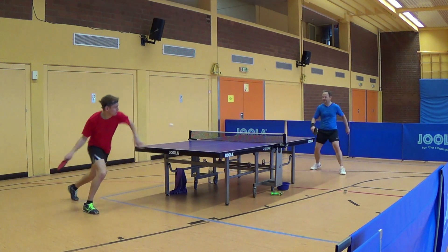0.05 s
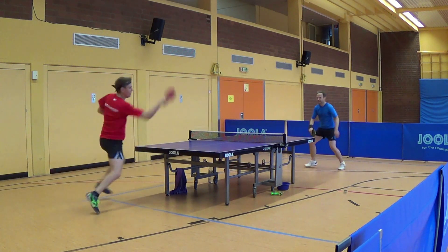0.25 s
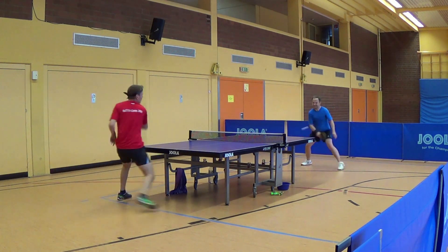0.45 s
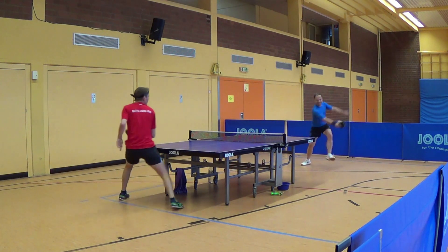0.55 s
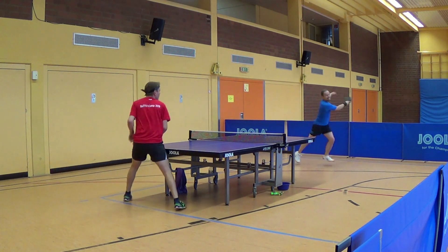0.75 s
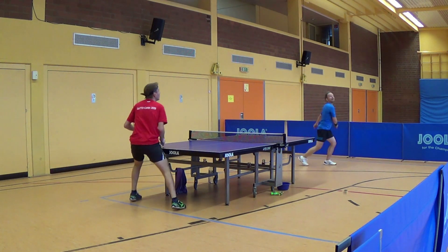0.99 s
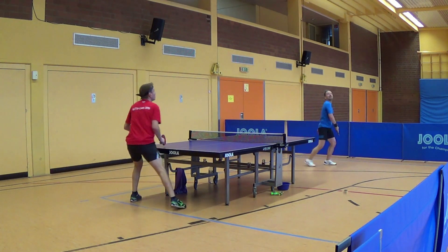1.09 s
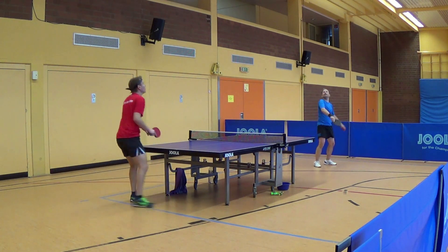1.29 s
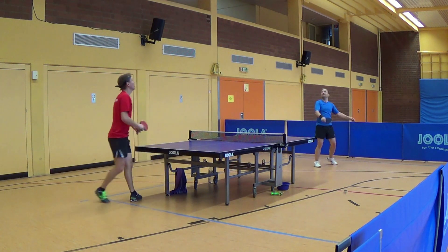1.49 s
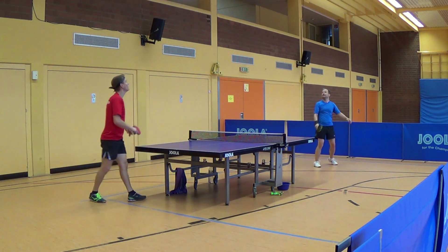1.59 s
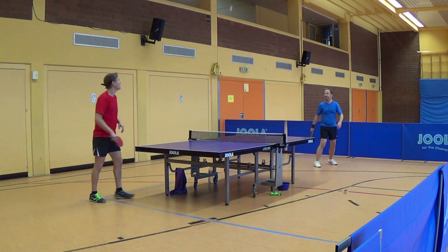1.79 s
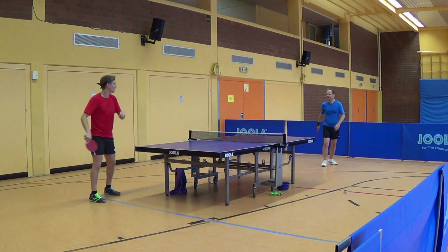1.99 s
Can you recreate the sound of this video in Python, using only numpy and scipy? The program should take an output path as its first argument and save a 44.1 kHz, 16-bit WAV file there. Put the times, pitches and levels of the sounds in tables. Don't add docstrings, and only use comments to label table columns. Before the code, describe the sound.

Short table tennis exchange in a big echoing gym: bat click, rubber sole squeaks and floor slaps, hard table bounce, far bat click with strong echo, one late squeak, then the ring fades into faint hiss.

```python
import sys
import numpy as np
from scipy import signal
from scipy.io import wavfile

SR = 44100
rng = np.random.default_rng(int(sys.argv[2]) if len(sys.argv) > 2 else 0)


def output_pcm(signal):
    pcm = np.clip(np.atleast_2d(signal).T, -1, 1) * 32767
    wavfile.write(sys.argv[1], SR, np.round(pcm).astype(np.int16))


def convert_level_to_amplitude(level_db):
    exponent = np.asarray(level_db, float) / 20
    return 10 ** exponent


N = 90404
LEAD_S = .1


def clock():
    return np.arange(N + int(LEAD_S * SR)) / SR - LEAD_S


def noise():
    return rng.standard_normal(len(clock()))


def rms_one(x):
    return x / np.sqrt(np.mean(x ** 2) + 1e-20)


def peak_one(x):
    return x / (np.abs(x).max() + 1e-12)


def at_hz(points, hz):
    table_hz, value = np.array(points).T
    return np.interp(np.log(hz), np.log(table_hz), value)


def low_pass(x, hz, order=2):
    return signal.sosfilt(signal.butter(order, min(hz, .45 * SR), fs=SR, output="sos"), x)


def resonate(x, peaks):
    out = 0
    for k, (hz, width_hz, db) in enumerate(peaks):
        r = np.exp(-np.pi * width_hz / SR)
        feed = (1 - r * r) / 2 * np.array([1, 0, -1])
        ring = [1, -2 * r * np.cos(2 * np.pi * hz / SR), r * r]
        out = out + (-1) ** k * convert_level_to_amplitude(db) * signal.lfilter(feed, ring, x + 1e-18)
    return out


def click(s):
    return np.diff(clock() >= s, prepend=False) * 1.0


def dying(s, length_s):
    t = clock() - s
    return (t >= 0) * np.exp(-np.clip(t, 0, None) / length_s)


def swell(s, length_s, sharp):
    return np.sin(np.pi * np.clip((clock() - s) / length_s, 0, 1)) ** sharp


# (frequency [Hz], likeness [share])
LIKENESS = [(50, 0.9455), (150, 0.992), (400, 0.642), (1500, 0.6381), (5000, 0.5731), (12000, 0.8649)]


def diffuse_bands(shape):
    out, edges = 0, 25 * 2 ** np.arange(0, 9.5, 1 / 3)
    white = rng.standard_normal((2, 2, len(clock())))
    for k, (low, high) in enumerate(zip(edges, edges[1:])):
        band = signal.butter(2, [low, high], "band", fs=SR, output="sos")
        mid, side = signal.sosfilt(band, white[k % 2])
        hz = np.sqrt(low * high)
        alike = np.clip(at_hz(LIKENESS, hz), -1, 1)
        stereo = np.sqrt(1 + alike) * mid + np.sqrt(1 - alike) * side * [[1], [-1]]
        out = out + shape(hz) * stereo
    return out


# (frequency [Hz], density [dB per Hz])
HISS_COLOUR = [(18, -31.5), (30, 14.5), (526, 6), (962, 3), (1630, 0.5), (2170, 4.5), (4910, -8),
               (13000, -6), (16000, -24)]
HISS_DB = -53.5
WHINE_HZ, WHINE_DB = 15625, -42.5


def room_tone():
    hiss = rms_one(diffuse_bands(lambda hz: convert_level_to_amplitude(at_hz(HISS_COLOUR, hz))))
    whine = np.sin(2 * np.pi * WHINE_HZ * clock())
    return convert_level_to_amplitude(HISS_DB) * hiss + convert_level_to_amplitude(WHINE_DB) * whine


# (frequency [Hz], time to fall 60 dB [s])
HALL_T60 = [(40, 1.1714), (150, 1.4079), (500, 1.4754), (1500, 1.6657), (5000, 1.7265), (9000, 1.0988),
            (14000, 0.6334)]
# (frequency [Hz], level [dB])
HALL_COLOUR = [(40, -10.5), (150, 1), (500, 1), (1500, 0.5), (4000, -7.5), (8000, -10), (14000, -8)]
HALL_BUILDS_S = 0.005


def hall(x):
    t = clock() + LEAD_S
    tail = diffuse_bands(lambda hz: convert_level_to_amplitude(at_hz(HALL_COLOUR, hz) - 60 * t / at_hz(HALL_T60, hz)))
    answer = tail * (1 - np.exp(-t / HALL_BUILDS_S))
    return signal.fftconvolve(answer, x[None], axes=1)[:, :len(t)]


# (time [s], length [s], level [dB], centre [Hz])
SOLE_SCUFFS = [
    (-.03, 0.08774, -40, 8225),
    (0.177, 0.12395, -36, 9252),
    (0.489, 0.06063, -31, 12000),
    (0.988, 0.0641, -38.5, 9000),
    (1.105, 0.10131, -39, 8793),
    (1.429, 0.04568, -44, 9500),
    (1.462, 0.12397, -46, 9500),
    (1.621, 0.094, -79.5, 8514),
    (1.906, 0.1427, -49, 4826),
]


def scuffs():
    white = low_pass(noise(), 12212)
    out = 0
    for s, length_s, db, hz in SOLE_SCUFFS:
        out = out + convert_level_to_amplitude(db) * swell(s, length_s, sharp=1.2) * resonate(white, [(hz, 2.708 * hz, 3)])
    return out


# (time [s], length [s], pitch [Hz], level [dB], higher at the start [share])
SOLE_SLIPS = [(0.255, 0.0275, 5051, -18, .02), (0.2615, 0.011794, 5020, -13, .11),
              (0.271, 0.008602, 5030, -8.5, .03), (0.286, 0.005785, 5300, -16, .02),
              (.295, 0.003857, 5036, -14.5, .01), (.301, 0.005178, 5262, -15.5, .02),
              (0.305, 0.006616, 5100, -13.5, .02), (0.384, 0.017924, 4275, -22.5, .06),
              (0.391, 0.03431, 4000, -25.5, .01), (0.407, 0.01522, 4700, -15.5, -.06),
              (0.417, 0.02096, 4200, -19.5, .05), (0.426, 0.014, 4421, -25.5, -.03),
              (0.435, 0.017615, 4167, -17, .05), (0.997, 0.009467, 4836, -21, .01),
              (0.998, 0.010766, 4930, -15.5, .015), (1.016, 0.00709, 4850, -15, .01),
              (1.024, 0.00956, 4900, -16.5, .01)]
SLIP_WOBBLE = .006
SLIP_OCTAVE_DB, SLIP_RASP = -16.5, 0.25923


def squeaks():
    wobble = rms_one(low_pass(noise(), 150))
    rasp = rms_one(low_pass(noise(), 600))
    out = 0
    for s, length_s, hz, db, higher in SOLE_SLIPS:
        slide = higher * np.clip(1 - (clock() - s) / length_s, 0, 1) ** 2
        phase = 2 * np.pi * np.cumsum(hz * (1 + slide + SLIP_WOBBLE * wobble)) / SR
        tone = np.sin(phase) + convert_level_to_amplitude(SLIP_OCTAVE_DB) * np.sin(2 * phase)
        out = out + convert_level_to_amplitude(db) * swell(s, length_s, sharp=0.9388) * tone
    return out * (1 + SLIP_RASP * rasp)


# (time [s], level [dB], boom [Hz], width [Hz])
FOOT_STAMPS = [(-.07, -36, 119.3, 86.4), (.351, -13.5, 174.7, 27.98), (.365, -13, 84.01, 17.426),
               (.405, -15, 184.6, 28.48), (.43, -20, 114.2, 28.186), (0.476, -24, 94.18, 16.53),
               (.545, -16, 183, 25.94), (.575, -28, 56.46, 12.99), (0.851, -12.5, 73.92, 21.801),
               (0.992, -22, 55, 25.87), (1.299, -32, 60.62, 17.05)]
# (frequency [Hz], width [Hz], level [dB])
FLOOR_BOARDS = [(55, 21.362, -4), (282.53, 158.24, -11.5), (459.78, 371.67, -11.5), (1101.1, 1696, -19)]
SOLE_CUT_HZ = 650.5


def stamps():
    out = 0
    for s, db, hz, width_hz in FOOT_STAMPS:
        push = low_pass(click(s), SOLE_CUT_HZ)
        out = out + convert_level_to_amplitude(db) * peak_one(resonate(push, [(hz, width_hz, 6)] + FLOOR_BOARDS))
    return out


# (time [s], level [dB], centre [Hz], length [s])
SOLE_SLAPS = [
    (.3505, -12, 6296, 0.000819),
    (0.366, -11.5, 2037, 0.001),
    (0.382, -17, 872.4, 0.001648),
    (.388, -10, 1189, 0.003633),
    (0.423, -11.5, 9865, 0.003711),
    (0.441, -21, 9500, 0.00731),
    (0.522, -28, 12920, 0.00907),
]


def slaps():
    white = noise()
    out = 0
    for s, db, hz, length_s in SOLE_SLAPS:
        sole = [(hz, 0.8344 * hz, 0)]
        once = resonate(white * dying(s, length_s), sole)
        out = out + convert_level_to_amplitude(db) * peak_one(resonate(once, sole))
    return out


# (frequency [Hz], width [Hz], level [dB])
EARLIER_HITS = [
    (-.06, -22.5, 2646),
    (.02, -30, 2516),
    (.068, -41, 2520),
]
EARLIER_TOP = [(439.4, 639.5, -7), (917.6, 217, -0.5), (1556.9, 762, -7)]
NEAR_HITS = [
    (.2195, -8, 13870),
    (.2405, -11.5, 8890),
    (.2495, -17.5, 8950),
]
NEAR_BAT = [(887.5, 443.6, -4), (1481.8, 564.5, -2), (2934, 200, -2.5), (3362.3, 230, -1.5),
            (6799, 908.4, -24), (8201, 230, 2), (10545, 1080, -10), (11730, 932, -33.5)]
TABLE_HITS = [
    (.6148, -5, 11110),
    (.6325, -19.5, 12960),
    (.652, -16.5, 6000),
    (1.664, -33.5, 2496),
]
TABLE_TOP = [(1164.6, 1200, -3), (1541.6, 270, 3), (2202.5, 1350, -7.5), (3769.5, 1482, -5.5),
             (6000, 823.1, -11), (8632.7, 959.2, -4.5), (10923, 651.7, -1)]
FAR_HITS = [
    (.8475, -10, 8534),
    (.851, -14, 4677),
    (.856, -34.5, 4980),
    (.862, -12.5, 13520),
    (.869, -9, 8900),
    (.884, -7, 4880),
]
FAR_BAT = [(523.7, 643.8, -6), (1486.7, 371.64, 4), (1977.2, 882, -1.5), (3500.4, 857.8, 1.5),
           (4700, 882, -2), (6149.7, 1628, -2.5), (9500, 859, -10.5)]
CONTACT_S, CHATTER = 0.0026563, 0.4864


def ball(hits, body, crack_db):
    white = noise()
    body = [(hz, max(width_hz, 300), db) for hz, width_hz, db in body]

    def strike(push, db, cut_hz):
        crack = push - low_pass(push, 905.8, order=1)
        ringing = resonate(push, body) + convert_level_to_amplitude(crack_db) * crack
        return convert_level_to_amplitude(db) * peak_one(low_pass(ringing, cut_hz))

    out = 0
    for s, db, cut_hz in hits:
        push = click(s) + CHATTER * white * dying(s, CONTACT_S)
        out = out + strike(push, db, cut_hz)
    first_s, first_db, first_cut_hz = hits[0]
    return out, strike(click(first_s), first_db, first_cut_hz)


BALL_WET_DB, FEET_WET_DB, SQUEAK_WET_DB, SCUFF_WET_DB = -17.5, -26, -26.5, -22.5


def scene():
    earlier, earlier_send = ball(EARLIER_HITS, EARLIER_TOP, -11.5)
    near, near_send = ball(NEAR_HITS, NEAR_BAT, -18)
    table, table_send = ball(TABLE_HITS, TABLE_TOP, -40)
    far, far_send = ball(FAR_HITS, FAR_BAT, -14)
    slap, stamp, squeak, scuff = slaps(), stamps(), squeaks(), scuffs()
    ball_send = near_send + convert_level_to_amplitude(0.5) * table_send + convert_level_to_amplitude(4.5) * far_send + convert_level_to_amplitude(2.0) * earlier_send
    send = convert_level_to_amplitude(BALL_WET_DB) * ball_send + convert_level_to_amplitude(FEET_WET_DB) * (stamp + convert_level_to_amplitude(3.0) * slap)
    send = send + convert_level_to_amplitude(SQUEAK_WET_DB) * squeak + convert_level_to_amplitude(SCUFF_WET_DB) * scuff
    left, right = convert_level_to_amplitude(np.array([[.6], [-.6]])), convert_level_to_amplitude(np.array([[-.7], [.7]]))
    direct = near * left + (table + far) * right + earlier + slap + stamp + squeak + scuff
    return (direct + convert_level_to_amplitude(-7) * hall(send) + room_tone())[:, -N:]


def top_cut(x):
    return signal.sosfilt(signal.butter(12, 16480, fs=SR, output="sos"), x)


def record(dry):
    bass_gain = convert_level_to_amplitude(np.array([[2.5], [-2.5]]))
    x = dry + low_pass(dry, 237.2, order=1) * (bass_gain - 1)
    x = low_pass(x, 12381)
    rounded = 0.9289 * np.tanh(x / 0.86299)
    mix = signal.sosfilt(signal.cheby2(12, 70, 16600, fs=SR, output="sos"), rounded)
    return top_cut(mix)


dry = scene()
out = record(dry)
output_pcm(out)
```